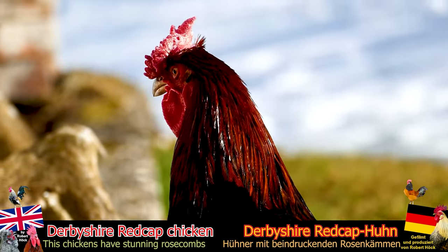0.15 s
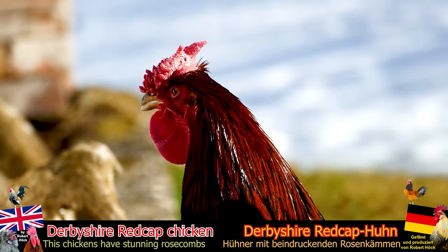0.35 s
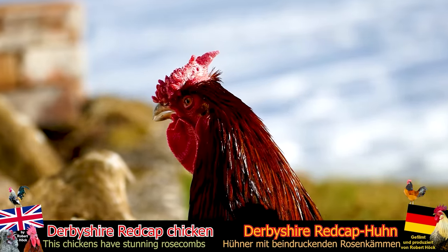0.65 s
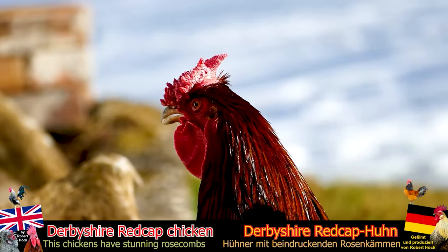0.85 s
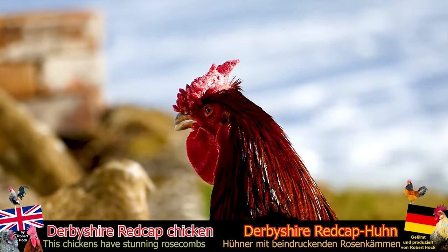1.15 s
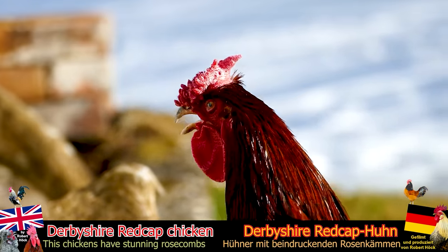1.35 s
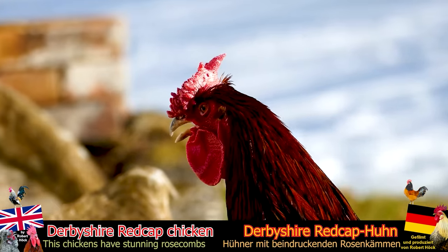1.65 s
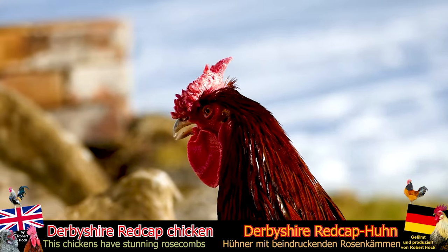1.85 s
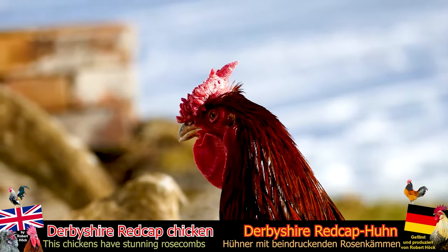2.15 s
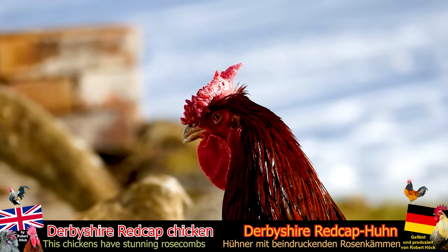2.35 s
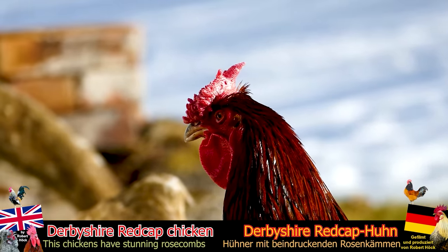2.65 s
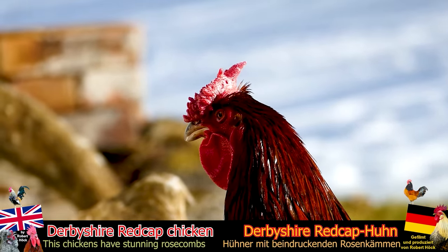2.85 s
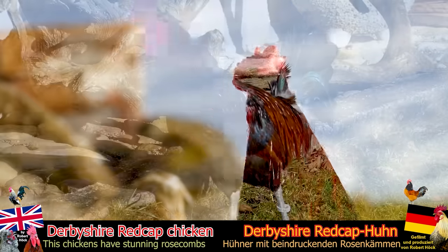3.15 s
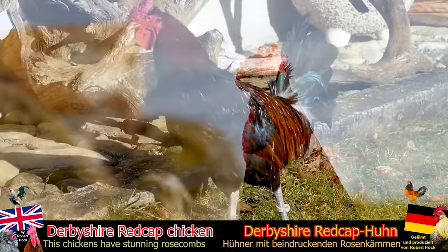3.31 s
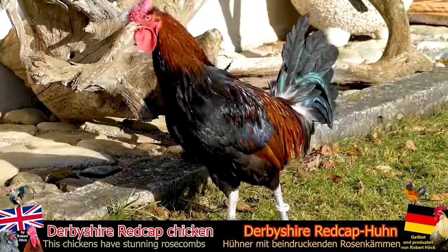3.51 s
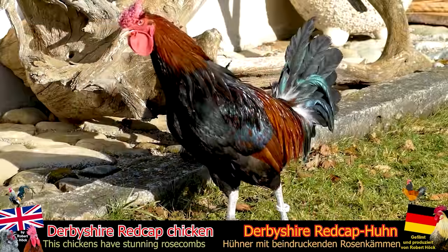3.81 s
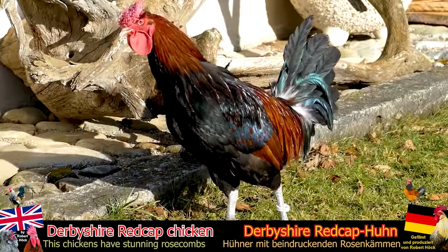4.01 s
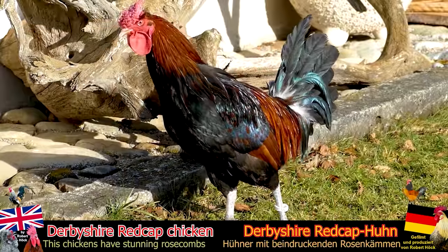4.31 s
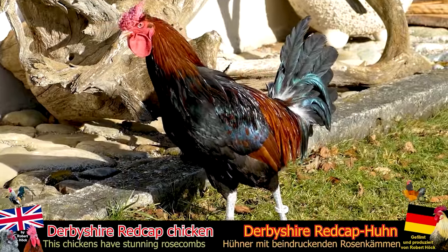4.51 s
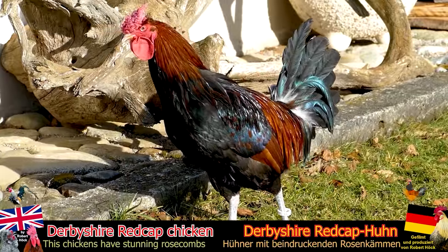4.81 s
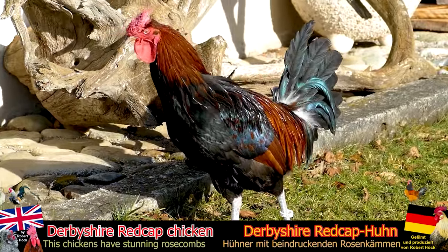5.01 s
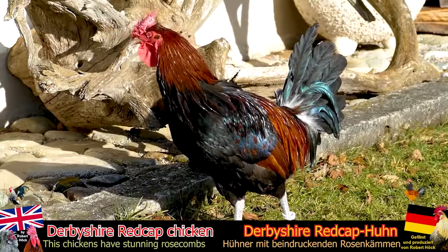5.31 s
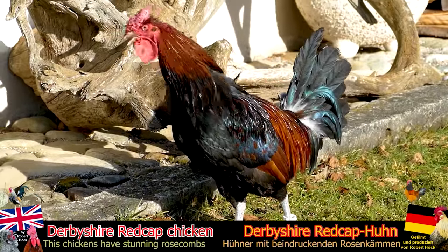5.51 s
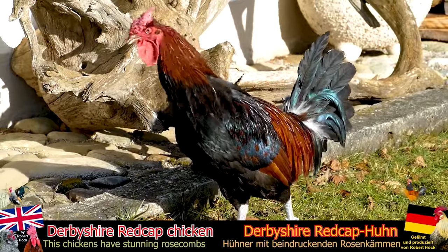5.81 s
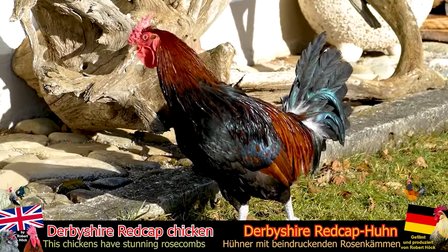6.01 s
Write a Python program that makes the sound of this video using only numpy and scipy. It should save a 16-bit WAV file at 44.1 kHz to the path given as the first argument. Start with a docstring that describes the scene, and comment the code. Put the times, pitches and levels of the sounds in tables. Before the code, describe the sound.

A hen in a yard gives short hoarse clucks that build into loud raspy squawks, three times over, above faint bird whistles and distant murmur.

```python
"""In a yard, hens give runs of short hoarse clucks that end in loud squawks, a gliding voice overlapped
by a steady lower one. Both are partials on a moving pitch, shaped by mouth and throat, plus pulsed breath.
A far hen answers and small birds whistle, each a single wavering tone. Distant traffic and leaves murmur
as shaped noise. Decaying noise tails scatter the voices, and a wall sends back an echo."""
import sys
import numpy as np
from scipy import signal
from scipy.fft import rfft, irfft, next_fast_len
from scipy.io import wavfile
from scipy.ndimage import uniform_filter1d, map_coordinates

SR = 44100
rng = np.random.default_rng(int(sys.argv[2]) if len(sys.argv) > 2 else 0)


def log_audio(samples):
    """Write samples as a 16-bit WAV file to the path given in sys.argv[1]."""
    # one column per channel
    frames = np.atleast_2d(samples).T
    # limit to full scale, then quantise
    limited = np.clip(frames, -1, 1)
    pcm = np.round(limited * 32767).astype(np.int16)
    wavfile.write(sys.argv[1], SR, pcm)


N = 271656  # length in samples
TOP_HZ = 15600  # upper band limit

# Squawks of the near hen, one list each. Each row: time in seconds, pitch in Hz, level of the voice in dB,
# lift by the opening beak in dB, hoarseness (level of the partials halfway between the others) in dB.
GLIDING_SQUAWKS = [
    [(1.462, 664.5, -35, -10, 5), (1.48, 794.5, -16.5, -5, -5), (1.5, 778, -23, 2, 8),
     (1.525, 747.5, -20, -19, -6), (1.545, 654, -21, 2, -16), (1.568, 652, -17.5, 0, -30),
     (1.59, 633, -26.5, 7, -9), (1.615, 593, -29.5, -5, -19), (1.635, 578, -24.5, 3, -21)],
    [(3.42, 661, -33.5, 0, -12), (3.44, 773, -18, -2, -11), (3.465, 788, -20.5, -4, -16),
     (3.49, 680.4, -22.5, 4.5, -45), (3.515, 662.5, -19, -5.5, -28), (3.55, 623, -28, 4, -7),
     (3.6, 630.5, -25, -7, -28), (3.618, 572, -25, 2, -23)],
    [(3.618, 716, -29, -3, -18), (3.636, 752, -15, -6, -31), (3.66, 757.5, -19, 1, -9),
     (3.678, 684, -24, 9, -8), (3.695, 641.5, -21, 7.5, -20), (3.72, 639, -17, -3, -28),
     (3.74, 608, -24.5, 3, -30), (3.765, 575, -54, 0, -25)],
    [(5.51, 673.4, -29, -1, -5), (5.533, 770, -17, -6, -8), (5.56, 755.7, -14.5, 7, -26),
     (5.582, 726, -16.5, -2, -19), (5.6, 643.3, -17, 7.5, -18), (5.625, 638.2, -17.5, 3, -18.5),
     (5.66, 622, -17.5, 0, -25), (5.71, 635, -17.5, -1.5, -34), (5.745, 614.6, -19.5, 1.5, -13.5),
     (5.76, 647, -38, 11, -14)],
]
# Squawks of a second hen on a level pitch. Each row: the same five columns.
STEADY_SQUAWKS = [
    [(1.61, 547.5, -24.5, -5, -25), (1.625, 521.4, -24.5, -2, -45), (1.65, 537, -21, 1.5, -41),
     (1.68, 546.5, -23.5, 6, -21), (1.7, 532, -23, 8.5, -39), (1.735, 526.8, -25.5, -19, -8.5),
     (1.765, 540, -57, -11, -17)],
    [(3.597, 535, -27, 0.0079, -18), (3.612, 522.5, -24.5, 0, -28), (3.65, 533.7, -24.5, 0, -5.5),
     (3.697, 515, -26, 0, -11)],
    [(3.737, 533.6, -15.5, 4, -16), (3.752, 524.7, -21.5, -2, -7), (3.775, 522.7, -18.5, -1, -17.5),
     (3.8, 516.7, -21, 2, -20), (3.845, 526.7, -18.5, -0.5, -15.5), (3.865, 526, -27, -4, -21),
     (3.88, 514, -32, -14, -21)],
    [(5.612, 550, -39, 15, -16), (5.645, 536, -28, 24, -14), (5.68, 542, -55, 10, -24)],
]
# Low resonances of each hen's mouth, below the throat's. Each row: frequency in Hz, relative gain in dB.
GLIDING_MOUTH = [(300, -6), (620, -3), (670, 14.5), (770, 18), (1000, -5), (1270, 14), (1400, 10),
                 (1550, -2), (1880, -2.5), (1960, 7), (2300, 2.5)]
STEADY_MOUTH = [(250, -24), (525, -1), (800, -22), (1040, -2), (1075, 13), (1570, 8.5), (1900, 14.5),
                (2150, 3)]
# Resonances of the squawking throat. Each row: frequency in Hz, relative gain in dB.
THROAT = [(2670, -20), (3050, -4.5), (3160, 1.5), (3500, -2), (3700, -17.5), (4050, -21), (4450, -21.5),
          (5000, -23), (5650, -13), (6400, -29), (7600, -28), (8500, -34.5), (9700, -25), (12300, -43.5),
          (14500, -47), (15500, -55)]
# Spectrum of the squawking breath. Each row: frequency in Hz, relative gain in dB.
BREATH = [(200, -58), (400, -16.5), (700, -3), (950, -19), (1300, 1.5), (2100, 2), (2700, -17), (3250, -7),
          (4300, -23), (4600, -77)]
BEAK_HZ = 4300  # partials above it are the treble, which has a level of its own
OPEN_HZ = 1690  # the opening beak lifts the partials above
TREBLE_DB, TREBLE_GROWS = -28, 0.17  # treble relative to the voice in dB; dB gained per dB of hoarseness
BREATH_DB, BREATH_GROWS = -7.5, 0.47  # breath relative to the voice in dB; dB gained per dB of hoarseness
ONSET_DB, ONSET_S = 2.5, 0.032  # extra treble as a squawk sets in, and its time constant


def squawks(notes, mouth):
    """Source-filter voice with period doubling: alternating cycles add subharmonics between the partials."""
    out = np.zeros(N)
    k = np.arange(1, 51)[:, None] / 2  # odd rows of the array are the whole partials
    rasp_spectrum = [(BEAK_HZ - 300, -120)] + [p for p in THROAT if p[0] > BEAK_HZ - 200]
    for rows in notes:
        at, edge, (hz, level_db, open_db, hoarse_db) = span(rows)
        n = len(hz)
        hz = hz * (1 + 0.0038 * wobble(n, 122))
        turns = np.cumsum(hz) / SR
        partial_hz = k * hz

        onset_db = ONSET_DB * np.exp(-np.arange(n) / SR / ONSET_S)
        treble_db = level_db + TREBLE_DB + TREBLE_GROWS * hoarse_db + onset_db
        lift_db = open_db / (1 + (OPEN_HZ / partial_hz) ** 8)
        size = amp(along(mouth + THROAT, partial_hz) + lift_db) * (partial_hz < TOP_HZ)

        # bring voice and treble to their levels, counting whole partials only
        treble = partial_hz > BEAK_HZ
        treble_gain = amp(treble_db) / rms_of((size * treble)[1::2])
        voice_gain = amp(level_db) / rms_of((size * ~treble)[1::2])
        size *= np.where(treble, treble_gain, voice_gain)
        size[::2] *= amp(hoarse_db)

        # the higher a partial, the less steady
        flicker = amp(np.minimum(.33 * k, 5) * wobbles(k, n, 45))
        drift = rng.random(k.shape) + np.minimum(0.00032 * k ** 3, .6) * wobbles(k, n, 159.3)
        tone = np.sum(size * flicker * np.sin(2 * np.pi * (k * turns + drift)), axis=0)
        breath = amp(level_db + BREATH_DB + BREATH_GROWS * hoarse_db) * puffs(turns, BREATH)
        rasp = amp(treble_db - 5) * puffs(turns, rasp_spectrum)
        out[at:at + n] += edge * (np.sqrt(2) * tone + breath + rasp)
    return out


# Clucks of the near hen. Each row: start in seconds, length in seconds, top pitch in Hz, pitch after the
# break in Hz, level before the swell in dB, brightness before its own swell in dB.
CLUCKS = [(0.349, 0.063, 326.7, 314.6, -32, -9.5), (0.582, 0.083, 400, 332, -29.5, -3.5),
          (0.827, 0.086, 384.5, 340, -28.5, -5), (1.071, 0.084, 403, 340.7, -30, -1.5),
          (1.332, 0.084, 431.7, 340.3, -30, 4), (1.944, 0.063, 381, 365, -30, -6.5),
          (2.825, 0.057, 329.6, 323, -32, -5), (3.048, 0.085, 393.3, 342, -29.5, 0.5),
          (3.234, 0.06, 358.4, 334, -40.5, 0.5), (3.296, .088, 432, 433, -31.5, 7.5),
          (4.113, 0.063, 327.5, 318.4, -31.5, 1.5), (5.156, 0.064, 313.6, 308.6, -35, -0.5),
          (5.386, 0.088, 409.6, 343, -30.5, 2.5), (5.945, 0.079, 450.7, 417.7, -30, 3)]
# Swells in dB, added to level and to brightness at the start, at the top, before and after the break,
# at the release and at the end.
CLUCK_SWELL_DB = -17, -2.5, -1.5, 5, -7, -26
CLUCK_BRIGHTEN_DB = -23.5, -8, 1, -14.5, -10, -12
# Hoarse croaks that end the squawks. Each row: start in seconds, length in seconds, pitch in Hz,
# level at the start in dB, brightness at the start in dB.
CROAKS = [(1.743, 0.03, 264, -31.5, 5), (3.86, .068, 419.2, -30.5, 2), (5.751, 0.038, 462.4, -29, 12)]
# shares of the length where pitch tops, breaks, has broken, and the voice lets go
TOP_AT, BREAK_AT, BROKEN_AT, RELEASE_AT = .28, .53, .6, 0.74
CLUCK_START_HZ, CLUCK_SAG = 267.2, .94  # pitch at the start; last pitch over that after the break
CLUCK_BREATH_DB, CROAK_BREATH_DB = -13.5, 0.5  # at full voice and 370 Hz
CROAK_FADE_DB, CROAK_DULL_DB = -17.5, -17.5  # change of level and of brightness by the end


def cluck_notes():
    """Register break: pitch leaps up, holds and drops; croaks hold their pitch and die away."""
    notes = []
    for s, length, top_hz, after_hz, db, bright_db in CLUCKS:
        times = s + length * np.array([0, TOP_AT, BREAK_AT, BROKEN_AT, RELEASE_AT, 1])
        pitch = [CLUCK_START_HZ, top_hz, top_hz, after_hz, after_hz, CLUCK_SAG * after_hz]
        levels = db + np.array(CLUCK_SWELL_DB)
        brights = bright_db + np.array(CLUCK_BRIGHTEN_DB)
        breaths = np.full(len(times), CLUCK_BREATH_DB)
        notes.append(list(zip(times, pitch, levels, brights, breaths)))
    for s, length, hz, db, bright_db in CROAKS:
        notes.append([(s + u * length, hz, db + u ** 1.1 * CROAK_FADE_DB,
                       bright_db + u * CROAK_DULL_DB, CROAK_BREATH_DB) for u in (0, .5, 1)])
    return notes


# Resonances of the clucking hen. Each row: frequency in Hz, relative gain in dB.
CROP = [(120, -43), (260, -3.5), (400, -3), (560, -5.5), (720, 7), (1000, -4.5), (1280, -1.5),
        (1500, -11.5), (2000, -0.5), (2250, -12), (2480, -11), (2800, -25.5), (3200, -23), (4170, -37.5),
        (5000, -39), (6000, -28.5), (8600, -52.5), (11500, -43), (15500, -86)]


def clucks():
    """Source-filter voice with jitter and shimmer; brightness sets the band above 1100 Hz against that below."""
    out = np.zeros(N)
    k = np.arange(1, 36)[:, None]
    for rows in cluck_notes():
        swell = [(s, hz, amp(db), *rest) for s, hz, db, *rest in rows]
        at, edge, (hz, level, bright_db, breath_db) = span(swell)
        n = len(hz)
        hz = hz * (1 + .008 * wobble(n, 150))
        turns = np.cumsum(hz) / SR
        size = amp(along(CROP, k * hz) + np.minimum(.6 * k, 4) * wobbles(k, n, 50))
        drift = 0.86 * rng.random(k.shape) + 0.0025 * k ** 2 * wobbles(k, n, 200)
        tone = np.sqrt(2) * np.sum(size * np.sin(2 * np.pi * (k * turns + drift)), axis=0) / rms_of(size)
        # the voice is breathier while it is weak or low
        breath_gain = amp(breath_db) * (level.max() / level) ** 0.66 * (hz / 370) ** -2.5
        voice = tone + breath_gain * puffs(turns, CROP)
        low = filtered(voice, lambda f: 1 / (1 + (f / 1100) ** 6))
        out[at:at + n] += edge * level * (unit(low) + amp(bright_db) * unit(voice - low))
    return out


# A far hen's strongest partial. Each row: start in seconds, length in seconds, first frequency in Hz,
# last frequency in Hz, peak level in dB.
FAR_CALLS = [(5.835, 0.067, 1663, 1645, -40.5), (6.014, 0.1, 1683, 1668, -40.5),
             (6.088, 0.2, 1560, 1590, -46)]
FAR_RISE_S, FAR_FADE_DB = 0.018, -17  # time to the peak; level at both ends relative to it


def far_notes():
    """Attack and decay envelope: a quick rise, then a fade."""
    return [[(s, first_hz, db + FAR_FADE_DB),
             (s + FAR_RISE_S, first_hz, db),
             (s + length, last_hz, db + FAR_FADE_DB)]
            for s, length, first_hz, last_hz, db in FAR_CALLS]


# Falling bird whistles. Each row: start in seconds, length in seconds, first pitch in Hz, top pitch in Hz,
# pitch the quick fall tends to in Hz (both before sag and hook), level before the swell in dB.
FALLING = [(4.525, 0.15, 4100, 6450, 5630, -51), (4.755, 0.12, 5270, 5120, 4240, -48.5),
           (4.981, 0.13, 4030, 6350, 5580, -46.5), (5.197, 0.14, 5340, 5040, 4310, -51),
           (5.443, 0.12, 6300, 6380, 5480, -43.5)]
# Swell of the falling whistles. Each row: share of the length, change of level in dB.
FALLING_SWELL = [(0, -15), (.1, -6), (.4, 0), (.75, -1), (1, -7)]
# Thin arched whistles. Each row: start in seconds, length in seconds, edge pitch in Hz, top pitch in Hz,
# level at the top in dB.
ARCHED = [(2.596, 0.23, 9050, 9600, -56.5), (2.87, .07, 8150, 8440, -71), (3.354, 0.085, 9080, 9160, -62)]
FLICK_S, FALL_S = .012, 0.029  # flick up to the top; time constant of the quick fall
SAG_HZ_PER_S, HOOK_HZ, HOOK_S = 2400, 200, .012  # slow sag; last hook down and its time constant
ARCH_EDGE_DB = -22  # level at the edges relative to the top


def bird_notes():
    """Frequency modulation: whistles that flick to a new pitch and relax down, and thin parabolic arches."""
    notes, u = [], np.linspace(0, 1, num=40)
    for s, length, first_hz, top_hz, settle_hz, db in FALLING:
        t = u * length
        flick = first_hz + (top_hz - first_hz) * t / FLICK_S
        fall = settle_hz + (top_hz - settle_hz) * np.exp(-np.maximum(t - FLICK_S, 0) / FALL_S)
        fall -= SAG_HZ_PER_S * t + HOOK_HZ * np.exp((t - length) / HOOK_S)
        hz = np.where(t < FLICK_S, flick, fall)
        notes.append(np.transpose([s + t, hz, db + np.interp(u, *np.transpose(FALLING_SWELL))]))
    for s, length, edge_hz, top_hz, db in ARCHED:
        off = (2 * u - 1) ** 2  # 0 at mid-length, 1 at the edges
        hz = top_hz - (top_hz - edge_hz) * off
        notes.append(np.transpose([s + u * length, hz, db + ARCH_EDGE_DB * off ** 2]))
    return notes


def whistles(notes, waver):
    """Pure tones: one sinusoid a note, with random wavering of frequency and amplitude."""
    out = np.zeros(N)
    for rows in notes:
        at, edge, (hz, db) = span(rows)
        n = len(hz)
        hz = uniform_filter1d(hz, size=350, mode="nearest") * (1 + waver * wobble(n, 84))
        level = amp(db + 1.8 * wobble(n, 40))
        out[at:at + n] += edge * level * np.sin(2 * np.pi * np.cumsum(hz) / SR)
    return out


# Spectrum of the far murmur. Each row: frequency in Hz, relative density in dB per Hz.
MURMUR = [(15, -64), (25, -44), (152, -7.5), (246, -3.5), (313, -6), (469, -7), (508, 0), (566, -16.5),
          (702, 3), (781, -3.5), (1340, -4.5), (1950, -11), (4370, -32), (5270, -33.5), (15500, -41)]
# Level of the far murmur. Each row: time in seconds, level in dB.
MURMUR_LEVEL = [(0.0, -46.5), (1.42, -47.5), (1.54, -45.5), (1.95, -47), (3.33, -45.5), (3.64, -45),
                (4.07, -48.5), (6.16, -47.5)]
# Spectrum of the leaves. Each row: frequency in Hz, relative density in dB per Hz.
LEAVES = [(3000, -21), (4000, 5), (5000, 6), (6500, -7), (8000, -28)]
# Level of the leaves. Each row: time in seconds, level in dB.
RUSTLE_LEVEL = [(0, -63), (.35, -74), (.6, -79), (2.9, -79), (3.15, -64), (3.4, -66), (3.6, -87)]
# Diffuseness of murmur and leaves. Each row: frequency in Hz, left-right correlation from 0 to 1.
YARD_ALIKE = [(60, 0.8), (180, 1), (550, 0.84), (1650, 0.46), (4970, 0.5), (15000, 0.11)]


def yard():
    """Diffuse noise field: the far murmur, and leaves stirring now and then."""
    level = lambda rows: amp(np.interp(np.arange(N) / SR, *np.transpose(rows)))
    unsteady = amp(0.7 * wobble(N, 14.0))
    murmur = level(MURMUR_LEVEL) * unsteady * rush(MURMUR, YARD_ALIKE, patchy_db=2.0)
    return murmur + level(RUSTLE_LEVEL) * rush(LEAVES, YARD_ALIKE, patchy_db=5.5)


def rush(spectrum, alike, patchy_db):
    """Partial coherence: mid and side noise, shared by frequency, with patches of random gain; rms 1."""
    z = signal.stft(rng.standard_normal((2, N)), nperseg=512)[2]
    # smooth the patches over frequency, then over time
    field = uniform_filter1d(uniform_filter1d(rng.standard_normal(z.shape[1:]), 6, 0), 14, 1)
    pair = signal.istft(z * amp(patchy_db * unit(field)), nperseg=512)[1][:, :N]

    def shares(hz):
        turn = np.arccos(np.clip(along(alike, hz), -1, 1)) / 2
        return amp(along(spectrum, hz)) * np.array([np.cos(turn), np.sin(turn)])

    mid, side = filtered(pair, shares)
    return unit(np.array([mid + side, mid - side]))


# Where each hen stands, as two lists. Each row of the first: frequency in Hz, left over right in dB.
# Each row of the second: frequency in Hz, phase by which left leads in radians.
GLIDING_SIDE = ([(60, -1.3), (150, -4), (380, 2.3), (950, -0.38), (2380, 4), (5980, 6), (15000, 10)],
                 [(0, 0), (860, 0.34), (3620, 0), (9730, 0.15), (12100, 0.069), (12800, 0.0), (15200, 0.1)])
STEADY_SIDE = ([(60, 4), (150, 15), (380, -2), (950, 4), (2380, 2.5), (5980, 5), (15000, 10)], [(0, -0.023),
                (860, 0.21), (3790, 0.05), (6030, 0.12), (9300, -0.1), (10500, 0.1), (15200, 0.1)])


def placed(x, side):
    """Stereo localization: a voice reaches left and right at different strength and phase."""
    balance, phase = side
    half = lambda hz: amp(along(balance, hz) / 2) * np.exp(.5j * along(phase, hz))
    return filtered(x, lambda hz: np.array([half(hz), 1 / half(hz)]))


# Reverberation. Each row: frequency in Hz, time to decay by 60 dB in seconds at linger = 1.
WALLS = [(300, 0.61), (1500, 0.95), (3500, 0.62), (10000, 0.077)]


def walls(x, delay, linger):
    """Reverberation: a delayed, scattered answer in which each frequency dies at its own speed."""
    hz, t, z = signal.stft(rng.standard_normal((2, SR // 2)), SR, nperseg=256)
    decay = amp(-60 * t / (linger * along(WALLS, hz))[:, None])
    tail = signal.istft(z * decay, SR, nperseg=256)[1]
    tail[1] = 1.7 * tail[0] + 0.73 * tail[1]  # the right is stronger and partly like the left
    tail /= np.linalg.norm(tail[0])
    late = np.pad(x, (round(delay * SR), 0))[None]
    return signal.fftconvolve(late, tail, axes=1)[:, :N]


def puffs(turns, spectrum):
    """Pulsed turbulence: breath noise let through once per vocal cycle, at rms 1."""
    gate = (1 + np.cos(2 * np.pi * turns)) ** 2
    return unit(filtered(gate * rng.standard_normal(len(turns)), lambda hz: amp(along(spectrum, hz))))


def wobble(n, rate):
    """Slow modulation: a smooth random curve, rate knots a second."""
    return map_coordinates(rng.standard_normal(int(n * rate / SR) + 4), [np.arange(n) * rate / SR])


def wobbles(k, n, rate):
    """Independent modulation: one random curve for each partial, with cosine joins between knots."""
    knots = rng.standard_normal((len(k), int(n * rate / SR) + 2))
    at = np.arange(n) * rate / SR
    i, u = at.astype(int), (1 - np.cos(np.pi * (at % 1))) / 2
    return knots[:, i] * (1 - u) + knots[:, i + 1] * u


def span(rows, fade=0.0063):
    """Amplitude envelope: first sample, a soft-edged window, and one value per sample for each column."""
    s, *cols = np.transpose(rows)
    t = np.arange(round(s[0] * SR), min(round(s[-1] * SR), N)) / SR
    edge = np.clip(np.minimum(t - s[0], s[-1] - t) / fade, 0, 1)
    return round(s[0] * SR), np.sin(edge * np.pi / 2) ** 2, [np.interp(t, s, c) for c in cols]


def filtered(x, response):
    """Linear filtering: the spectrum of x times a complex response of frequency."""
    m = next_fast_len(x.shape[-1] + 8192)
    return irfft(rfft(x, m) * response(np.fft.rfftfreq(m, 1 / SR)), m)[..., :x.shape[-1]]


def along(points, hz):
    """Logarithmic frequency scale: (Hz, value) points joined by straight lines on it."""
    f, v = np.transpose(points)
    return np.interp(np.log(hz + 1), np.log(f + 1), v)


def amp(db):
    """Decibel scale: amplitude ratio for a level."""
    return 10 ** (np.asarray(db) / 20)


def unit(x):
    """Root mean square: x scaled to rms 1."""
    return x / np.sqrt(np.mean(x ** 2) + 1e-20)


def rms_of(partials):
    """Energy summation: root of the summed squares of the partials."""
    return np.sqrt(np.sum(partials ** 2, axis=0)) + 1e-9


def scene():
    """Superposition: direct voices, their reflections and the background add up."""
    near = squawks(GLIDING_SQUAWKS, GLIDING_MOUTH) + clucks()
    other = squawks(STEADY_SQUAWKS, STEADY_MOUTH)
    small = whistles(bird_notes(), waver=.0025) + whistles(far_notes(), waver=.004)
    hens = placed(near, GLIDING_SIDE) + placed(other, STEADY_SIDE)

    close = amp(-14) * walls(near + other, delay=.002, linger=.12)
    # ground and stones nearby scatter mostly treble
    close = filtered(close, lambda hz: (1 + (hz / 3000) ** 2) ** 0.72)
    around = amp(-32.5) * walls(near + other, delay=.02, linger=1.1)
    echo = amp(-34.5) * walls(near + other, delay=0.16, linger=0.2)  # one far wall
    small_around = amp(-8.5) * walls(small, delay=0.012, linger=0.55)
    return hens + close + around + echo + small + small_around + yard()


def record(dry):
    """Band limiting: nothing from TOP_HZ upward is kept."""
    return filtered(dry, lambda hz: hz < TOP_HZ)


dry = scene()
out = record(dry)
log_audio(out)
```